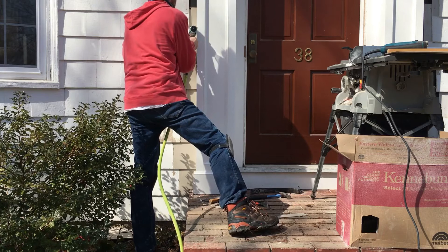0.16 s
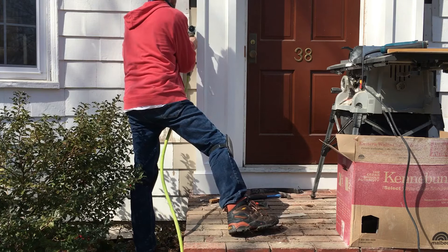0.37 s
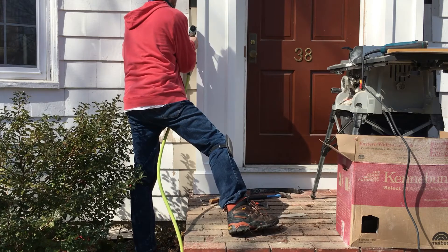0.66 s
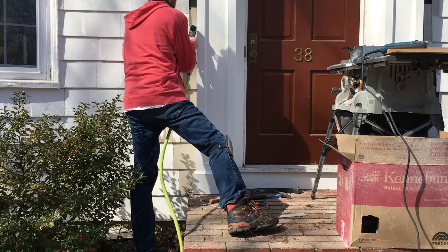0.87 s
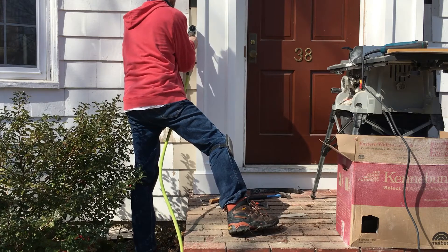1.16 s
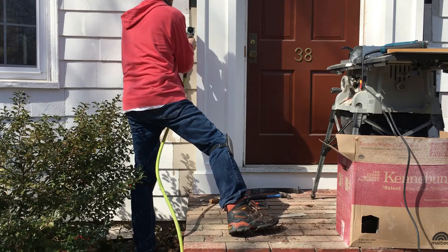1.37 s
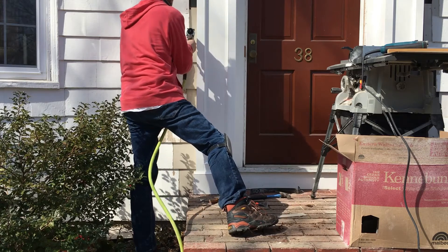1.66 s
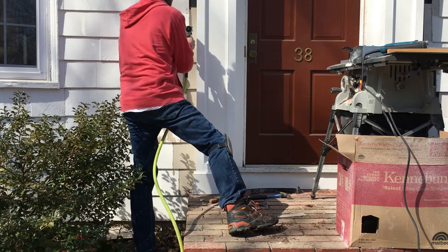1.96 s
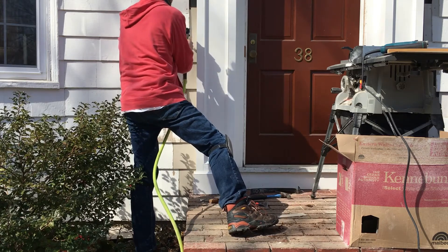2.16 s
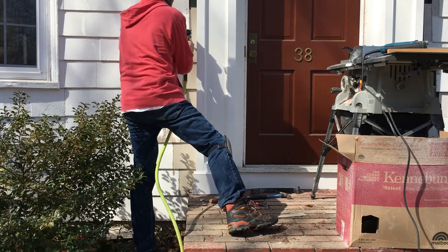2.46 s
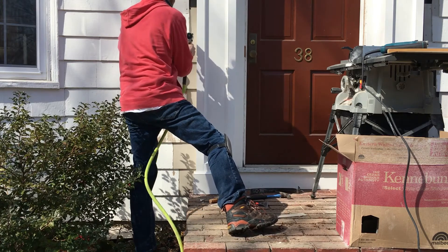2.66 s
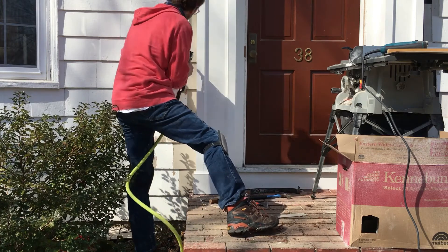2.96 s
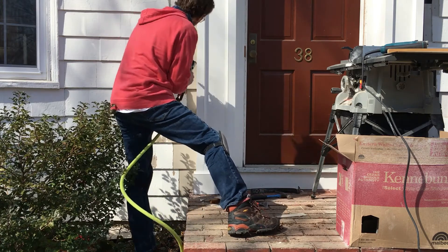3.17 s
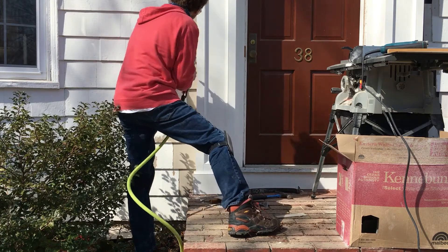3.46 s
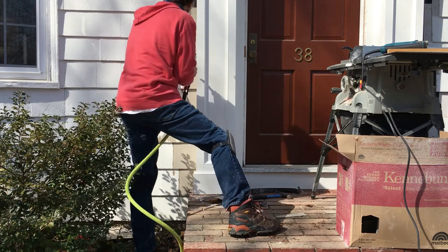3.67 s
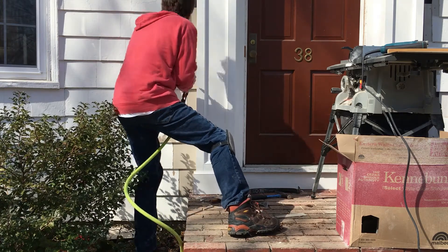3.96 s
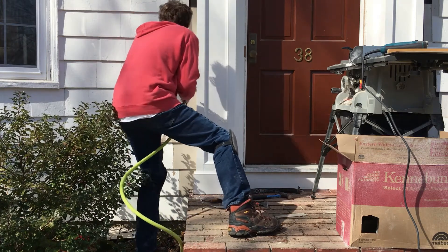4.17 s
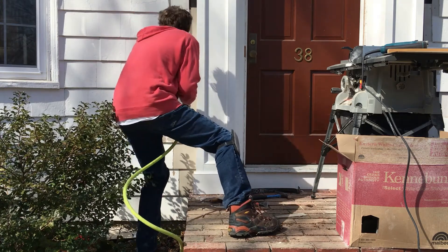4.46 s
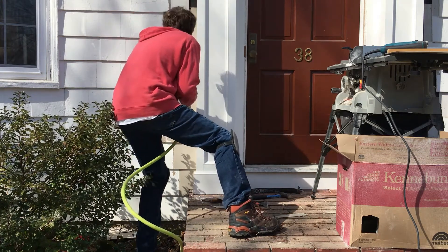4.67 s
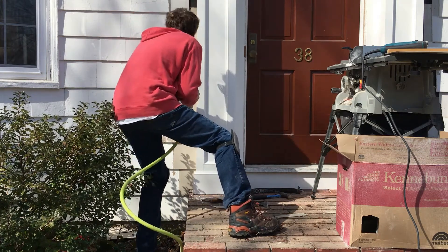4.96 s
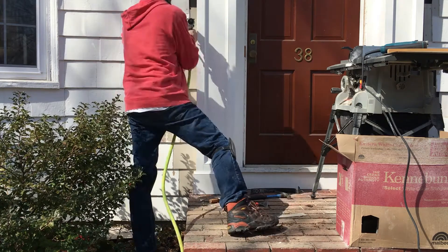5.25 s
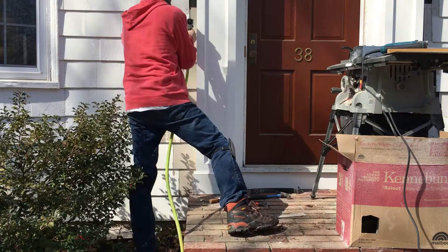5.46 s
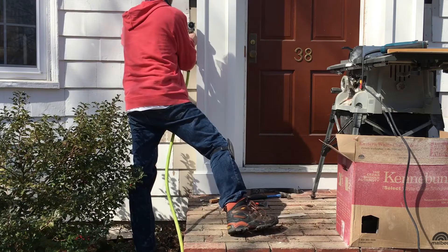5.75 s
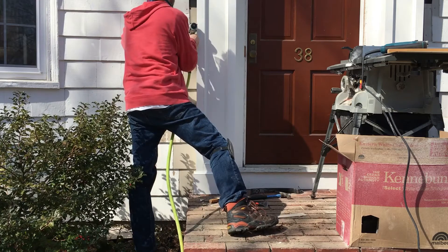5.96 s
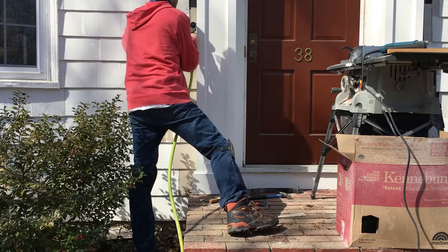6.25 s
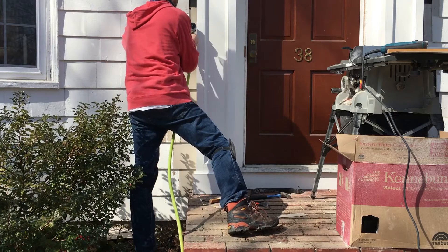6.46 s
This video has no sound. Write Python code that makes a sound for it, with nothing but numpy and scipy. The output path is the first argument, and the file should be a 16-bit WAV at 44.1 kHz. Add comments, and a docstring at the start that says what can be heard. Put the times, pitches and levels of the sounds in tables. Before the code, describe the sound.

A pneumatic nail gun fires twice into a wooden wall outdoors, each sharp crack followed by an air spit, over faint birds and traffic.

```python
"""A pneumatic nailer drives two nails into wood shakes on a house wall, a few metres from the microphone.
Each shot is a piston blow that rings gun and wall, then a blast of exhaust air as the trigger is let go.
The spot is an open yard, and the garden and the houses opposite send each shot back.
Between shots the gun clicks as it is handled, sleeves rustle and the air hose slides.
Farther off, birds whistle and chip over the low rumble of distant roads. One microphone, mono."""
import sys
import numpy as np
from scipy import signal
from scipy.fft import rfft, irfft
from scipy.io import wavfile
from scipy.ndimage import uniform_filter1d, minimum_filter1d

SR = 44100
rng = np.random.default_rng(int(sys.argv[2]) if len(sys.argv) > 2 else 0)


def digitize_waveform(pressure):
    """Quantize a signal to 16-bit integers and store it at the path in sys.argv[1].

    Rows of a 2-D input are taken as channels; values are limited to [-1, 1].
    """
    field = np.atleast_2d(pressure).T
    bounded = np.clip(field, -1, 1)
    quanta = np.round(bounded * 32767).astype(np.int16)
    wavfile.write(sys.argv[1], SR, quanta)


N = 291942
T = np.arange(N) / SR
AGE = T[:SR // 2]  # seconds since the start of a short sound

# wash of distant roads: (frequency [Hz], relative level [dB])
ROAD_SPECTRUM = [(20, -34), (36, -14), (58, 0.5), (85, -1.5), (125, -6), (175, -10.5), (235, -12),
                 (340, -18), (1050, -25), (1650, -31.5), (2900, -44), (4600, -52.5), (8000, -58),
                 (16000, -62)]
# far vehicles rumbling by: (loudest at [s], level [dB], rise [s], fall [s])
RUMBLES = [(2.2, -50, .6, 1.1), (5.22, -39.5, 0.22, 0.23), (6.2, -49.5, 0.69, .7)]
# far engines losing speed: (loudest at [s], level [dB], rise [s], fall [s], pitch [Hz], sag [Hz/s])
ENGINES = [(2.3, -54, .3, 0.47, 122.4, 2), (3.73, -53.5, 0.18, 1.4, 169.4, 13),
           (5.4, -51, 0.29, 1.3, 126.4, 2)]
# slow wavering of their drone: (rate [Hz], relative level [dB])
WAVER_SPECTRUM = [(1, 0), (6, 0), (20, -40), (100, -120)]

# the nearer songbird's falling whistles: (time [s], pitch of the tail before it sags [Hz], level [dB])
WHISTLES = [(4.05, 2360, -62), (4.604, 2230, -57)]
# swell of a whistle's tail: (time into the whistle [s], level against the opening [dB], rise [s], fall [s])
WHISTLE_TAIL = [(.26, -5, 0.087, 0.12)]
# a small bird chipping farther off: (time [s], top pitch [Hz], level [dB])
CHIPS = [(1.703, 5450, -68), (1.785, 5440, -68), (1.866, 5370, -71), (1.956, 5400, -67.5),
         (2.042, 5250, -70.5), (2.131, 5160, -66.5), (2.217, 5300, -65.5), (2.309, 5280, -66)]
# thin, far calls: (time [s], length [s], start pitch [Hz], end pitch [Hz], level [dB])
PEEPS = [(3.35, 0.027, 7420, 8100, -80), (3.56, 0.07, 6420, 6560, -83.5), (4.29, 0.054, 7100, 7280, -85),
         (5.15, 0.089, 7070, 7230, -82), (5.45, 0.063, 7300, 7610, -90)]

# the air hose sliding once: (fastest at [s], level [dB], rise [s], fall [s])
HOSE_SLIDE = [(2.92, -73.5, 0.35, 0.28)]
# arm movements that rustle the sleeves: (fastest at [s], level [dB], rise [s], fall [s])
ARM_MOVES = [(2.58, -67.5, 0.095, 0.095), (2.8, -69.5, 0.09, 0.19), (3.07, -68.5, 0.041, 0.086),
             (3.3, -78, 0.11, 0.27), (3.71, -74, 0.022, .04), (3.93, -68.5, 0.16, 0.24),
             (5.07, -67.5, 0.074, .07)]
# rubbing fabric: (frequency [Hz], relative level [dB])
CLOTH_SPECTRUM = [(500, -7.5), (2500, -0.5), (5000, -4), (7800, -3.5), (10500, -2.5), (13000, -3.5),
                  (16000, -8)]
# small handling clicks: the gun touching the shakes, and faint trigger clicks just before the second shot:
# (time [s], click level [dB], centre [Hz], t60 [s])
HANDLING_CLICKS = [(.109, -68, 1900, .05), (.216, -60, 7500, 0.023), (0.28, -58, 3200, 0.11),
                   (.571, -62.5, 8500, 0.034), (1.806, -61, 7000, 0.032), (2.563, -61, 12000, 0.083),
                   (2.614, -59.5, 5500, 0.059), (2.649, -46.5, 2730, 0.03), (2.827, -56, 7500, 0.016),
                   (3.032, -56.5, 4230, .035), (3.168, -64.5, 9500, 0.069), (3.68, -66.5, 5000, .04),
                   (3.835, -65.5, 11100, .04), (4.99, -64.5, 6000, .04), (5.414, -71.5, 5980, 0.037),
                   (5.533, -51, 1590, 0.051), (5.545, -54.5, 1700, 0.051), (5.682, -47, 1870, 0.094),
                   (5.839, -68, 3000, .04), (6.102, -56, 1800, 0.031), (6.111, -55, 2000, 0.042)]
# modes of the gun pressed on the wall: (frequency [Hz], relative level [dB], t60 [s])
WALL_MODES = [(62.25, -24, 0.23), (113, -29.5, 0.14), (206, -15.5, 0.15), (294.5, -21, .07),
              (390.6, -11, 0.0836), (503.8, -12.5, 0.053), (610, -20.5, .06), (697.5, -19, .06),
              (810, -19, .06), (1150, -15, 0.0729), (1273.4, -10, 0.098), (1410, -10.5, 0.05),
              (1482, -9.5, 0.039), (1558, -11, .06), (1610, -10, 0.053), (1889, -15.5, 0.041),
              (2003, -17, 0.034), (2240, -15.5, .06), (2630, -16.5, 0.018), (3006, -13.5, .055),
              (3210, -19, .06), (3540, -21, 0.066)]

# returns from the near garden and the houses opposite: (delay [s], relative level [dB], rise [s], fall [s])
YARD_RETURNS = [(.068, 1.5, .045, .105), (.235, -3.5, .05, .04)]
# colour of those returns: (frequency [Hz], relative level [dB])
YARD_SPECTRUM = [(60, -8.5), (300, -12), (700, -6), (1400, -3.5), (3000, -2), (6000, 0), (9000, -1.5),
                 (12000, -5.5), (16000, -9.5)]
# long echo paths, their treble lost in the air: (frequency [Hz], relative level [dB])
FAR_SPECTRUM = [(100, -14.5), (500, -4), (1500, -0.5), (3000, -1.0), (6000, -6.5), (9000, -15),
                (16000, -34.0)]

# the exhaust jet: (frequency [Hz], relative level [dB])
JET_SPECTRUM = [(60, -9.5), (230, 11), (600, 1), (1000, 6), (1600, 3), (2600, 1), (5000, -0.5), (8000, 0.5),
                (10500, 2), (13000, 0.5), (16000, 0.5)]
# the low puff of released air: (frequency [Hz], relative level [dB])
PUFF_SPECTRUM = [(20, -9), (60, -3), (120, 0), (230, -7), (400, -15.5), (1000, -35), (4000, -71)]
# the piston rattling home: (time after trigger release [s], relative level [dB])
RETURN_KNOCKS = [(0.0286, -0.5), (0.0323, 1), (.0366, -2.5)]
# inrushing air and tearing wood: (frequency [Hz], relative level [dB])
CRACK_SPECTRUM = [(60, -7), (200, 1.5), (500, 2), (950, -4.5), (1450, 5.5), (2000, 0), (3200, -1),
                  (4800, -4.5), (6200, -2.5), (9600, -6.5), (11200, -9.5), (16000, -16.5)]
# knocks of one stroke, launch to recoil: (time after the blow [s], relative level [dB])
STROKE_KNOCKS = [(0, 1), (.0033, -9.5), (.0092, -9), (0.0143, -6), (0.023, -10)]
# the two shots, each level a trim on its own part:
# (blow time [s], blow [dB], trigger release [s], exhaust jet [dB], low puff [dB], piston return [dB])
SHOTS = [(0.9132, 1, 1.0424, 4, -15.5, -10.5), (6.1244, 1.5, 6.2240, 4.5, -27.5, -8)]


def undb(db):
    """Decibels to gain."""
    return 10 ** (np.asarray(db) / 20)


def unit(x):
    """Scale to rms 1."""
    return x / np.sqrt(np.mean(x ** 2))


def add(track, s, x):
    """Mix a sound into the track at time s."""
    i = max(int(round(s * SR)), 0)
    track[i:i + len(x)] += x[:len(track) - i]


def band(x, lo_hz, hi_hz, order=2):
    """Causal band-pass."""
    edges_hz = [lo_hz, min(hi_hz, SR / 2 - SR / 20)]
    return signal.sosfilt(signal.butter(order, edges_hz, "band", fs=SR, output="sos"), x)


def noise(spectrum, size=len(AGE)):
    """Noise of rms 1 with a (frequency [Hz], level [dB]) spectrum."""
    hz, db = np.transpose(spectrum)
    bins_hz = np.maximum(np.fft.rfftfreq(size, 1 / SR), 1)
    gain = undb(np.interp(np.log(bins_hz), np.log(hz), db))
    return unit(irfft(rfft(rng.standard_normal(size)) * gain, size))


def band_noise(lo_hz, hi_hz, size=len(AGE), order=2):
    """Noise of rms 1 in one band."""
    return unit(band(rng.standard_normal(size), lo_hz, hi_hz, order))


def jitter(size, span, mode="reflect"):
    """Random wobble of rms 1, smoothed over span samples."""
    return unit(uniform_filter1d(rng.standard_normal(size), size=span, mode=mode))


def burst(rise, hold, t60):
    """Envelope that opens, holds and dies away; times in seconds."""
    return (1 - np.exp(-AGE / rise)) * undb(-60 * np.maximum(AGE - hold, 0) / t60)


def swells(rows, t=T):
    """Bell-shaped gains from (time [s], level [dB], rise [s], fall [s]) rows; their powers add."""
    gains = [undb(db) * np.exp(-((t - s) / np.where(t < s, rise, fall)) ** 2)
             for s, db, rise, fall in rows]
    return np.linalg.norm(gains, axis=0)


def note(hz, gain):
    """A pure tone along a pitch line, with soft ends."""
    soft_ends = signal.windows.tukey(len(hz), SR / 200 / len(hz))
    return np.sqrt(2) * gain * np.sin(2 * np.pi * np.cumsum(hz) / SR) * soft_ends


def traffic(wash_db=-45):
    """Roads in the distance: an even wash, swelling rumbles and the wavering drone of engines."""
    out = undb(wash_db) * noise(ROAD_SPECTRUM, N) + swells(RUMBLES) * band_noise(54, 69, N)
    for s, db, rise, fall, hz, sag_hz_per_s in ENGINES:
        waver = noise(WAVER_SPECTRUM, N)
        pitch_hz = (hz - sag_hz_per_s * (T - s)) * (1 + 0.01227 * waver)
        out += note(pitch_hz, swells([(s, db, rise, fall)]) * undb(2.1 * waver))
    return out


def whistle(pitch_hz, length_s=0.45, sag_hz_per_s=1650):
    """A songbird's loud slur flicks down onto a ledge of pitch, then drops to a soft, fluttering tail."""
    flick_hz, flick_s = 953, 0.00694
    ledge_ratio, ledge_s, drop_s = 1.36, .026, 0.017
    age = AGE[AGE < length_s]
    falling = np.maximum(age - ledge_s, 0)
    ledge = 1 + (ledge_ratio - 1) * np.exp(-falling / drop_s)
    hz = pitch_hz * ledge + flick_hz * np.exp(-age / flick_s) - sag_hz_per_s * falling
    slur = burst(rise=0.0061, hold=0.083, t60=.09)[:len(age)]
    flutter = undb(4 * jitter(len(age), span=900, mode="wrap"))
    return note(hz, slur + swells(WHISTLE_TAIL, age) * flutter)


def birds():
    """Whistles nearer the microphone, chips and peeps farther off, scattered by trees and houses."""
    near, far = np.zeros((2, N))
    for s, pitch_hz, db in WHISTLES:
        add(near, s, undb(db) * whistle(pitch_hz))
    # each chip is two quick, buzzy upward flicks, the second stronger
    progress = np.linspace(0, 1, int(.03 * SR))
    flicks = 1 - 0.15 * (1 - (2 * progress) % 1)
    for s, top_hz, db in CHIPS:
        buzz = 1 + .03 * jitter(len(progress), span=30)
        add(far, s, note(top_hz * buzz * flicks, undb(db - 10 * (1 - progress))))
    for s, length, start_hz, end_hz, db in PEEPS:
        glide_hz = np.linspace(start_hz, end_hz, int(length * SR))
        add(far, s, note(glide_hz + 110 * jitter(len(glide_hz), span=60), undb(db)))
    scatter = rng.standard_normal(len(AGE)) * burst(rise=0.0021, hold=0.0081, t60=0.33)
    scatter /= np.linalg.norm(scatter)
    # the farther the bird, the more of it arrives scattered
    return near + far + signal.fftconvolve(undb(-3) * near + undb(-2) * far, scatter)[:N]


def hose():
    """A narrow, high swish as the air hose is drawn along."""
    return swells(HOSE_SLIDE) * band_noise(6400, 9900, N)


def clothes(still_db=-87):
    """Sleeves slide in tiny slips and their folds crackle, barely heard while the arms are still."""
    slips = undb(2 * jitter(N, span=400))
    folds = (rng.random(N) < 45 / SR) * rng.uniform(0, 1, N) ** 2  # sparse, uneven ticks
    crackle = signal.fftconvolve(folds, burst(rise=.0001, hold=.0005, t60=0.013))[:N]
    motion = np.hypot(swells(ARM_MOVES), undb(still_db))
    return motion * unit(noise(CLOTH_SPECTRUM, N) * (slips + undb(14.5) * crackle))


def wall_ring(rise, hold):
    """The modes of gun and wall, driven for a moment and then left to fade."""
    hz, db, t60 = np.transpose(WALL_MODES)[:, :, None]
    age = AGE[:SR // 6]
    fade_db = -60 * np.maximum(age - hold, 0) / t60
    modes = undb(db + fade_db) * np.sin(2 * np.pi * (hz * age + rng.random(hz.shape)))
    ring = modes.sum(axis=0) * (1 - np.exp(-age / rise))
    return np.pad(ring, (0, len(AGE) - len(age)))


def handling_clicks():
    """Small clicks, from contact with the shakes or from the trigger, faintly ring gun and wall."""
    out = np.zeros(N)
    for s, db, hz, t60 in HANDLING_CLICKS:
        click = unit(band(band_noise(hz / 2, hz * np.sqrt(2), order=1), 600, 13000))
        add(out, s, undb(db) * click * burst(rise=0.00084, hold=0.0014, t60=t60))
        # a dull click drives the ring more than a light, bright tick
        add(out, s, undb(db + 4) * 2000 / hz * wall_ring(rise=0.0011, hold=0.0022))
    return out


def yard(x):
    """Open-air echo: a thin scatter that ends at the houses opposite, then dull returns from beyond."""
    echo = np.zeros(SR)
    add(echo, 0, noise(YARD_SPECTRUM) * swells(YARD_RETURNS, AGE))
    add(echo, .24, undb(-11.5) * noise(FAR_SPECTRUM) * burst(rise=.02, hold=.03, t60=0.99))
    add(echo, .36, undb(-8.5) * band_noise(200, 900) * burst(rise=.002, hold=0.0056, t60=0.059))
    return undb(-24) * signal.fftconvolve(x, echo / np.linalg.norm(echo))[:N]


def echoes(handling, directions):
    """Shots and clicks come back to the microphone from several sides of the yard at once."""
    out = np.zeros(N)
    for _ in range(directions):
        blows, air = nailer()
        # the wall beams its main ring straight out, so less of it reaches the rest of the yard
        spread = blows - 0.35 * band(blows, 1150, 1800, order=1)
        out += yard(spread + air + handling)
    return out / np.sqrt(directions)


def knock(hz, t60):
    """Piston or valve striking inside the housing: a short, heavily damped ring with a dull click."""
    ring = np.sin(2 * np.pi * hz * AGE) * undb(-60 * AGE / t60)
    click = undb(-5) * rng.standard_normal(len(AGE)) * burst(rise=.0002, hold=0.003, t60=0.015)
    return band(ring + click, 1000, 3300, order=3)


def exhaust(jet_db, puff_db, return_db, stop_s=.006):
    """The valve clicks, the cylinder dumps its air and the piston rattles back."""
    out = undb(-12) * knock(hz=2500, t60=0.012)
    # the jet opens with a sharp spit, then drains the cylinder
    spit = undb(-4.5) * burst(rise=.001, hold=.003, t60=0.018)
    drain = burst(rise=.001, hold=.012, t60=0.11)
    add(out, .0035, undb(jet_db - 17.5) * noise(JET_SPECTRUM) * (spit + drain))
    # the valve hits its stop, harder for a stronger puff
    add(out, stop_s, undb(puff_db / 2 + 0.5) * knock(hz=1140, t60=0.016))
    # the released air swings to and fro, slower as its pressure drops
    swing_hz = 42 + 115 * np.exp(-AGE / 0.0076)
    swing = np.sin(2 * np.pi * np.cumsum(swing_hz) / SR) * burst(rise=0.00098, hold=0.0046, t60=0.11)
    add(out, stop_s, undb(puff_db + 5.5) * swing)
    add(out, stop_s, undb(-25) * noise(PUFF_SPECTRUM) * burst(rise=0.0022, hold=.007, t60=.06))
    for s, db in RETURN_KNOCKS:
        add(out, s, undb(return_db + db - 7) * knock(hz=1950, t60=0.0068))
        rattle = band_noise(900, 3500, order=4) * burst(rise=0.0002, hold=.001, t60=0.036)
        add(out, s, undb(return_db + db - 16.5) * rattle)
    return out


def blow(strike_s=.0064):
    """The piston knocks, gun and wall ring, and the nail tears through the wood."""
    out = undb(-11) * wall_ring(rise=.003, hold=.011)
    for s, db in STROKE_KNOCKS:
        add(out, s, undb(db - 6) * knock(hz=1476, t60=0.018))
    # air rushes in behind the piston
    out += undb(-33.5) * noise(CRACK_SPECTRUM) * burst(rise=.0003, hold=strike_s, t60=0.018)
    # steel meets steel with one bright snap
    snap = band_noise(5200, 15000) * burst(rise=.0001, hold=0.00059, t60=.006)
    add(out, strike_s, undb(-17) * snap)
    # wood fibres break in quick, uneven spurts
    spurts = undb(2 * jitter(len(AGE), span=50))
    tear = noise(CRACK_SPECTRUM) * spurts * burst(rise=0.0028, hold=0.011, t60=.08)
    add(out, strike_s, undb(-15.5) * tear)
    return out


def nailer():
    """Blows and exhaust as sent in one direction; each direction has its own turbulent detail."""
    blows, air = np.zeros((2, N))
    for blow_s, blow_db, release_s, jet_db, puff_db, return_db in SHOTS:
        add(blows, blow_s, undb(blow_db) * blow())
        add(air, release_s, exhaust(jet_db, puff_db, return_db))
    return blows, air


def scene():
    """From a spot in the yard: the nailer a few metres off, its echoes, birds and traffic behind."""
    blows, air = nailer()
    handling = handling_clicks()
    work = blows + air + handling + echoes(handling, directions=4)
    return (work + clothes() + hose() + birds() + traffic())[None]


def record(dry, ceiling=.68, top_hz=15700):
    """The microphone port has a narrow dip; a fast limiter holds the peaks down; the top is cut."""
    sound = dry - 0.69 * band(dry, 10050, 10700, order=1)
    gain = ceiling / np.maximum(np.abs(sound), ceiling)
    gain = uniform_filter1d(minimum_filter1d(gain, size=45), size=45)  # held and eased over 1 ms
    low_pass = signal.ellip(8, .1, 50, top_hz, fs=SR, output="sos")
    return signal.sosfiltfilt(low_pass, sound * gain)


dry = scene()
out = record(dry)
digitize_waveform(out)
```